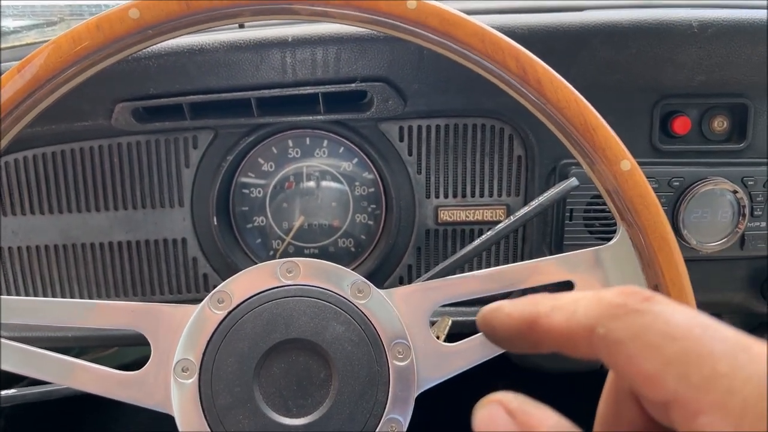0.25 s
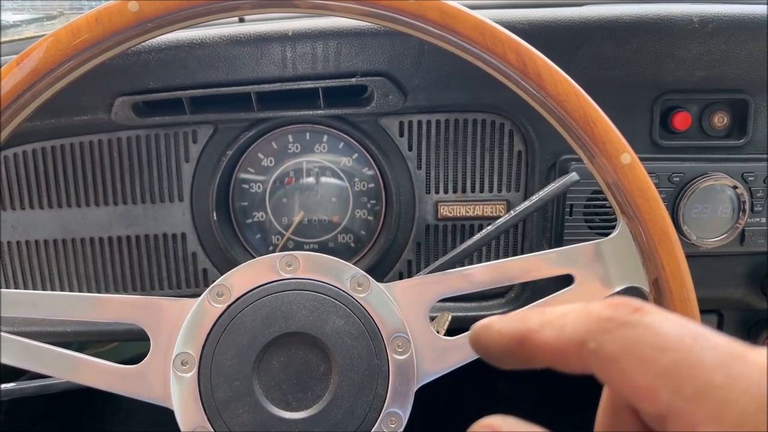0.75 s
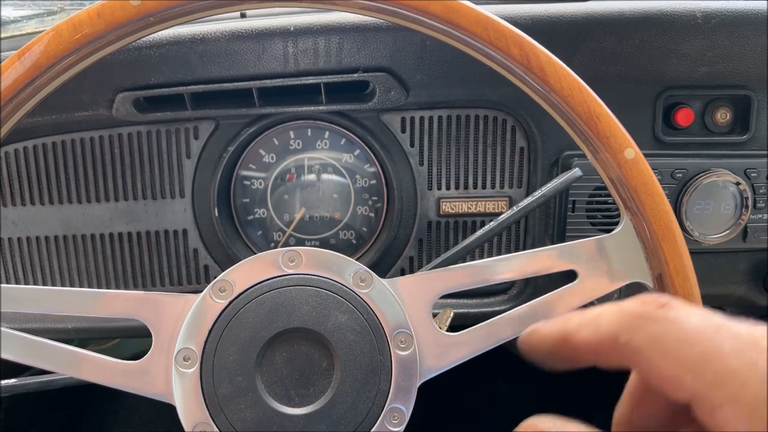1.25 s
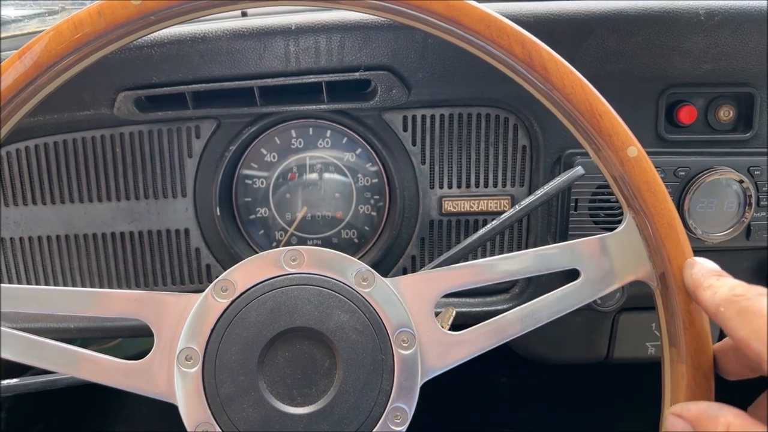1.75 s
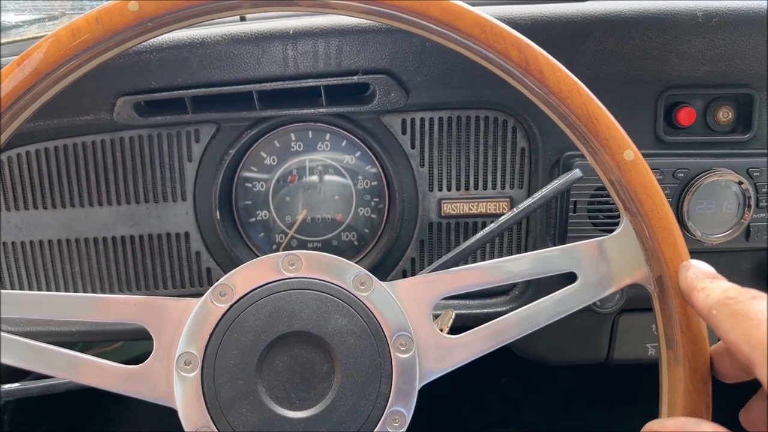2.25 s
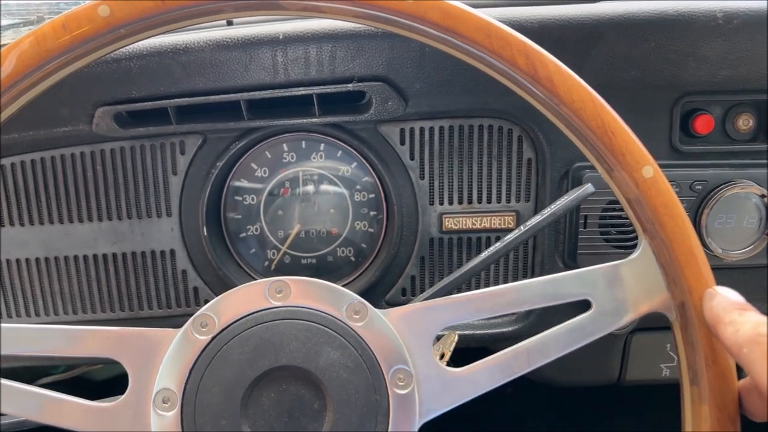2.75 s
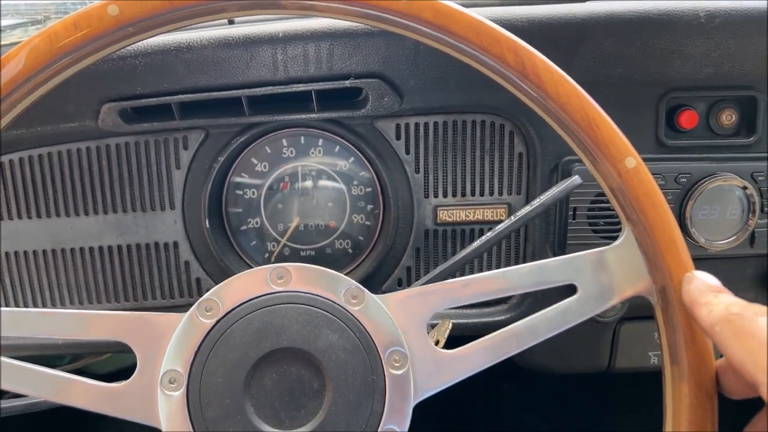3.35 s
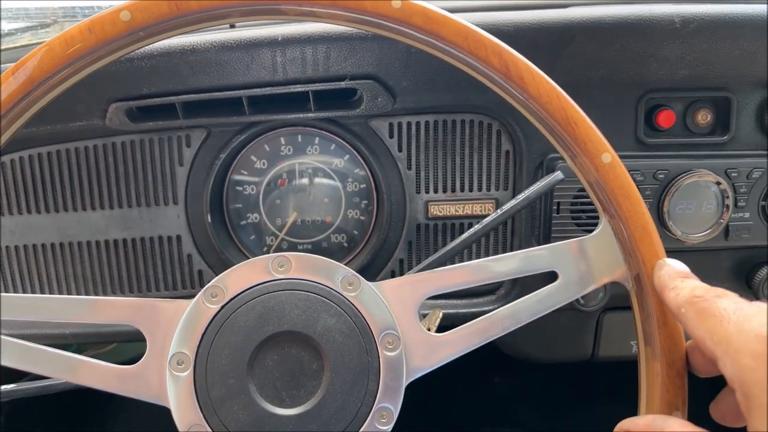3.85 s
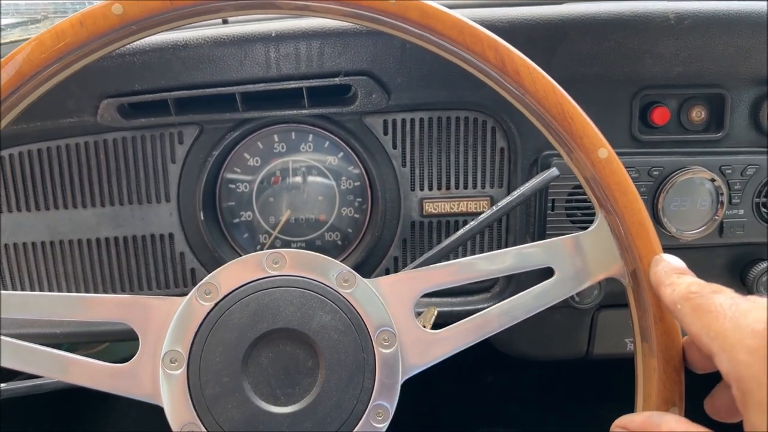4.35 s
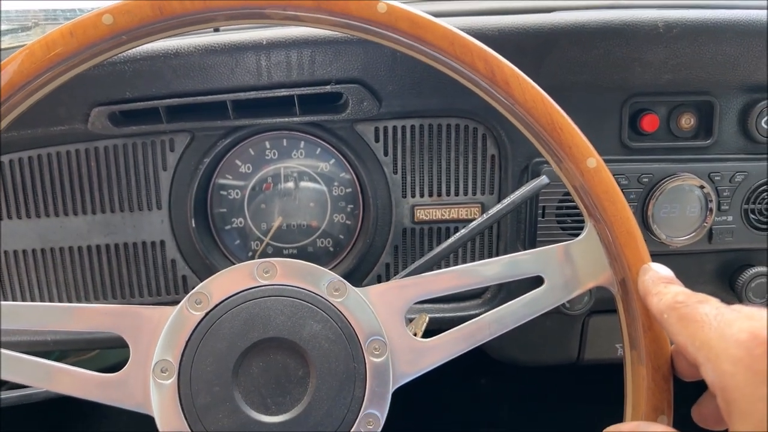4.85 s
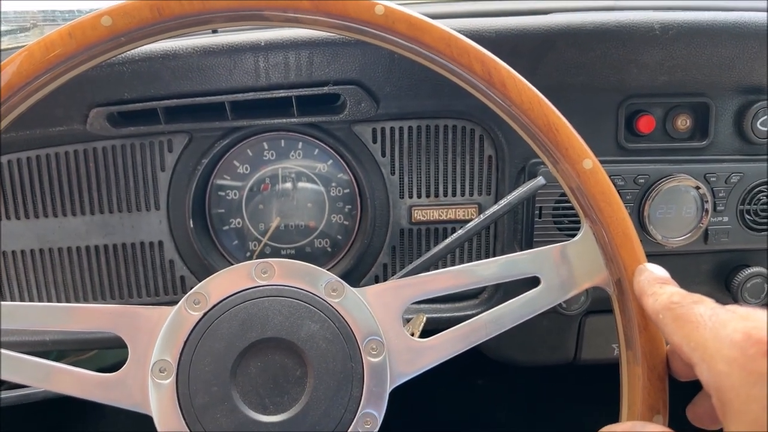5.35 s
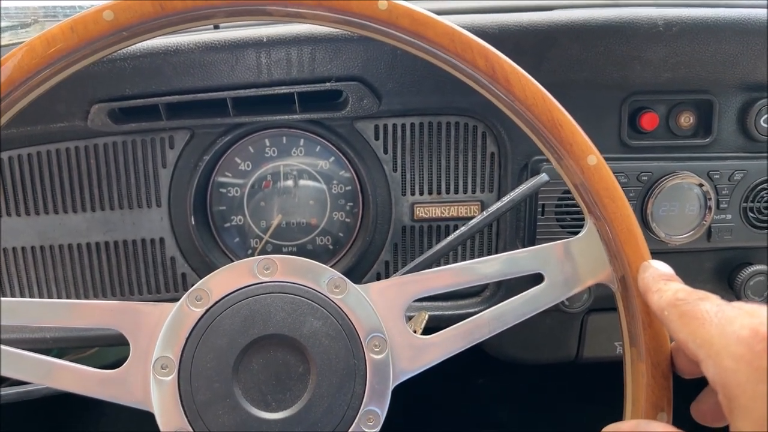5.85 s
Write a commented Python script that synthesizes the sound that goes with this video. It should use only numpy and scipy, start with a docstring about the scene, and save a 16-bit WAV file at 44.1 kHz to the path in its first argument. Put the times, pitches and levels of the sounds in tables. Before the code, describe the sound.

An air-cooled four-cylinder car engine is heard from the driver's seat, booming and rumbling through the cabin. A short rev sinks toward idle with a slight misfire. A longer rev follows, with ringing tappets, intake hiss and a roaring, faintly whining cooling fan. The engine then coasts down to an uneven chug with a few distinct valve taps, before a third rev starts climbing.

```python
"""Air-cooled four-cylinder engine from the driver's seat, at two microphone ports a few cm apart.
0-0.6 s: a short rev; the firing orders boom through the cabin, then sink toward idle and misfire.
1.5-3.9 s: a long rev; loose tappets ring, the intake hisses, the cooling fan roars and whines.
3.9-5.3 s: the engine coasts down to an uneven chug; single valve taps stand out.
From 5.3 s: a third rev climbs to the end, tappets ringing again. The mounts rumble throughout."""
import sys
import numpy as np
from scipy import signal
from scipy.fft import rfft, irfft, next_fast_len
from scipy.io import wavfile
from scipy.ndimage import uniform_filter1d

SR = 44100
rng = np.random.default_rng(int(sys.argv[2]) if len(sys.argv) > 2 else 0)


def master_out(mix):
    """Clip the mix to full scale and print it as 16-bit PCM to the path in sys.argv[1]."""
    frames = np.transpose(np.atleast_2d(mix))
    ceiling = np.clip(frames, -1, 1)
    pcm = np.round(ceiling * 32767).astype(np.int16)
    wavfile.write(sys.argv[1], SR, pcm)


N = 268524
TIME_S = np.arange(N) / SR

# crank speed: time_s, firing_hz
CRANK_SPEED = [(0.0, 56.1), (0.19, 68.7), (0.3, 77.8), (0.47, 85.8), (0.57, 89.4), (0.8, 74.4), (0.9, 69.6),
               (1.29, 51.1), (1.51, 42.3), (1.59, 41.8), (1.81, 54.1), (2.0, 64.4), (2.2, 72.6),
               (2.42, 77.6), (2.61, 80.5), (2.97, 85.0), (3.24, 87.1), (3.85, 90.6), (3.97, 82.7),
               (4.31, 65.7), (4.87, 42.2), (5.11, 32.6), (5.29, 31.8), (5.32, 32.6), (5.61, 49.3),
               (5.73, 56.4), (5.9, 65.8), (6.09, 72.7)]
# pedal presses, bark added to orders 8 and up: pressed_s, released_s, bark_db
PEDAL_PRESSES = [(-0.067, 0.565, -1), (1.48, 3.878, -1), (5.335, 6.5, 1)]
# orders 1, 2, 3 .. of the four-stroke cycle, order 4 the firing rate: throttle_open_db, throttle_shut_db
EXHAUST_ORDERS = [(-8.5, -0.5), (7, 7), (-14, -12), (2.5, 2), (-13, -25.5), (-3.5, -10.5), (-16, -8.5),
                  (0.5, -9.5), (-20, -24.5), (-14.5, -8), (-16.5, -35), (-1, -13), (-20, -32.5),
                  (-17.5, -15.5), (-15.5, -24), (-8, -25), (-25.5, -25.5), (-17.5, -16.5), (-16.5, -19),
                  (-20, -24.5), (-18, -26.5), (-33.5, -24), (-11.5, -22.5), (-26, -26), (-19, -21.5)]
# exhaust pipe resonance: firing_hz, order8_open_db, order8_shut_db, order4_shut_db
PIPE_RESONANCE = [(32, 13.5, 10.5, 2), (40, 2.5, 18, -0.5), (46.3, 4, -14.5, -4), (54.4, 3, 9, -3),
                  (56.3, 5.5, -0.5, 1), (61.2, 2, -0.5, 1), (70.6, -5, 7.5, 1.5), (73.4, -1.5, 6, 4),
                  (80, -11.5, 0.5, 2.5), (90.5, -15, -9.5, 2.5)]
# weak firings near idle: time_s, dip_db
WEAK_FIRINGS = [(1.27, -10), (1.34, -6), (1.51, -7), (4.6, -5), (4.885, -9), (5.12, -6), (5.19, -4),
                (5.28, -5), (5.39, -12)]
# modes of body shell and cabin air: pitch_hz, width_hz, left_db, right_db
CABIN_MODES = [(49.7, 3.4, -9, 9.5), (81.2, 8.3, 15, 3), (88, 14.8, 17.5, 18), (137.3, 6, 9, 12.5),
               (182.9, 15.9, 14.5, 7.5), (211.5, 8.7, 10, 9), (234.7, 4.7, -5.5, -7), (379.5, 12, -15.5, 3),
               (437, 31.3, 4.5, -2), (502, 22.2, -4.5, 6.5)]
# neighbouring modes cancelling at the seat: centre_hz, width_hz, depth_ratio
CABIN_NOTCHES = [(171.2, 6.8, 0.47), (281, 77, 0.55)]
# fan air and tinware: freq_hz, density_db
FAN_SPECTRUM = [(350, -30), (600, 0.5), (669, 2), (737, -9), (988, -4), (1980, -12.5), (2160, -15),
                (2300, -13.5), (2800, -15.5), (5240, -22.5), (8000, -30), (10400, -57.5), (17600, -120)]
# valve gear: freq_hz, density_db
CLATTER_SPECTRUM = [(2200, -8.5), (3000, 0.5), (3400, 2.5), (4000, -8), (4800, 0.5), (5500, -1),
                    (6500, -7.5)]
# rocker cover modes: pitch_hz, level_db, t60_s
COVER_MODES = [(3013, 1.5, 0.076), (3363, 6, 0.024), (4700, -4.5, 0.065), (5040, 5, 0.023),
               (5470, -10, 0.033)]
# valve taps that stand out at low speed: peak_s, level_db
VALVE_TAPS = [(4.6707, -67), (4.8408, -54), (4.9107, -50), (5.1237, -49), (5.1885, -51), (5.2743, -62),
              (5.366, -62), (5.5173, -62), (5.7024, -56), (5.849, -65)]
# loose tappets as the engine picks up: start_s, level_db, pitch_hz
TAPPET_HITS = [(1.5888, -52, 4580), (1.6851, -48, 4870), (1.7414, -46, 2950), (1.7604, -47, 4930),
               (1.8317, -52, 4850), (1.8344, -49, 2920), (1.9041, -51, 4620), (1.9505, -44, 2430),
               (2.0253, -50, 4900), (5.2744, -49, 4790), (5.3627, -48, 4640), (5.3916, -50, 4800),
               (5.4444, -47, 2980), (5.47, -44.5, 4860), (5.4929, -46, 3880), (5.5573, -52, 4830),
               (5.6244, -48, 4700), (5.6544, -46, 4750), (5.688, -45, 3070), (5.7024, -41, 4700),
               (5.7409, -43, 2550), (5.7808, -40, 4850), (5.8865, -44, 3020)]
# intake air: freq_hz, density_db
INTAKE_SPECTRUM = [(5500, -17), (7000, -7.5), (9000, 0.5), (11000, -7), (13000, -3.5), (15000, -8)]
# shaking that follows no order: freq_hz, density_db
RUMBLE_SPECTRUM = [(15, 4), (30, 2.5), (60, -11), (100, 2.5), (200, -4), (280, 6.5), (400, 0), (800, -7)]
# likeness of the ports: freq_hz, coherence_ratio
PORT_COHERENCE = [(600, 0.51), (1200, 0.61), (2500, 0), (5000, 0.3), (8000, 0.7)]
# phase between the ports: freq_hz, left_lead_rad
PORT_PHASE = [(430, 6.25), (780, 1.9), (1550, 2.78), (3100, 7.9), (4900, 7.6)]
# balance of the ports: freq_hz, left_minus_right_db
PORT_BALANCE = [(60, 7.5), (180, 3.5), (550, 1), (1650, 3.5), (4970, 8), (15000, -4.5)]

FULL_FIRING_HZ, FULL_PULL_HZ_PER_S = 90, 60  # reference speed and acceleration
PEDAL_RISE_S, PEDAL_RELEASE_S = 0.064, 0.02


def crank():
    """Pedal and crankshaft: firing rate, throttle 0-1, pull (acceleration over its reference)."""
    throttle = np.zeros(N)
    for pressed_s, released_s, _ in PEDAL_PRESSES:
        opening = 1 - np.exp(-np.maximum(TIME_S - pressed_s, 0) / PEDAL_RISE_S)
        throttle += opening * np.clip((released_s - TIME_S) / PEDAL_RELEASE_S + 0.5, 0, 1)
    firing_hz = uniform_filter1d(np.interp(TIME_S, *np.transpose(CRANK_SPEED)), size=2000, mode="nearest")
    pull = np.maximum(np.gradient(firing_hz) * SR / FULL_PULL_HZ_PER_S, 0)
    return firing_hz, throttle, uniform_filter1d(pull, size=8000)


def exhaust(cycles, throttle, firing_hz, pull, spread_turns=0.088, skew_turns=-0.33):
    """Orders of the four-stroke cycle; no two firings are alike, least so with the throttle shut."""
    shut, idle, bark = 1 - throttle, near_idle(throttle, firing_hz), bark_db()
    pipe_hz, *pipe_db = np.transpose(PIPE_RESONANCE)
    open8_db, shut8_db, shut4_db = (np.interp(firing_hz, pipe_hz, column) for column in pipe_db)
    boost_db = {4: shut * shut4_db,
                8: throttle * open8_db + shut * shut8_db,
                12: 12 * shut * np.clip((40 - firing_hz) / 8, 0, 1)}  # boom at the slowest coasting
    pulses = np.zeros(N)
    for order, (open_db, shut_db) in enumerate(EXHAUST_ORDERS, 1):
        unevenness = order * (0.0005 * order * throttle + 0.008 * shut + 0.012 * idle)
        waver = 1 + unevenness * (wander(hz=12) + 1j * wander(hz=12))
        phase_turns = order * cycles + spread_turns * order ** 2 + skew_turns  # offsets shape the pulse
        order_db = throttle * open_db + shut * shut_db + boost_db.get(order, 0) + (order >= 8) * bark
        pulses += gain_of(order_db) * (waver * np.exp(2j * np.pi * phase_turns)).real
    return gain_of(-26 + 4.5 * np.log10(firing_hz / FULL_FIRING_HZ) - pull) * pulses


def bark_db():
    """Each pedal press drives the upper orders a little harder or softer."""
    return sum(db * np.clip((TIME_S - pressed_s) / PEDAL_RISE_S, 0, 1) * (TIME_S < released_s)
               for pressed_s, released_s, db in PEDAL_PRESSES)


def near_idle(throttle, firing_hz, edge_hz=52):
    """Near 1 when coasting slowly, else near 0."""
    return (1 - throttle) / (1 + (firing_hz / edge_hz) ** 16)


def chug(cycles, throttle, firing_hz, thump_s=0.0017, uneven_db=2.5):
    """Near idle the mixture burns unevenly: each firing is a thump of its own strength."""
    firing = np.floor(4 * cycles).astype(int)
    strength = gain_of(-34 + uneven_db * rng.standard_normal(600))[firing]
    age = (4 * cycles - firing) / firing_hz / thump_s
    thump = age ** 2 * (3 - age) * np.exp(1 - age)
    return near_idle(throttle, firing_hz) * strength * thump


def misfire_gain(width_s=0.013):
    """The exhaust dips at each weak firing."""
    return gain_of(sum(db * np.exp(-((TIME_S - at_s) / width_s) ** 2) for at_s, db in WEAK_FIRINGS))


def cabin(shaking, low_hz=48, high_hz=830):
    """Shell and air resonate; each port hears the modes at its own strength."""
    size = next_fast_len(N + SR)
    hz = np.fft.rfftfreq(size, 1 / SR) + 1e-3
    power = sum(gain_of([[left_db], [right_db]]) ** 2 / (1 + ((hz - mode_hz ** 2 / hz) / width_hz) ** 2)
                for mode_hz, width_hz, left_db, right_db in CABIN_MODES)
    power /= (1 + (low_hz / hz) ** 6) * (1 + (hz / high_hz) ** 8)
    for notch_hz, width_hz, depth in CABIN_NOTCHES:
        power *= (1 - depth / (1 + (2 * (hz - notch_hz) / width_hz) ** 2)) ** 2
    log_gain = np.log(power + 1e-9) / 2
    minimum_phase_rad = -signal.hilbert(np.c_[log_gain, log_gain[:, -2:0:-1]]).imag[:, :len(hz)]
    return irfft(rfft(shaking, size) * np.exp(log_gain + 1j * minimum_phase_rad), size)[:, :N]


def fan(cycles, throttle, firing_hz, roar_db, blade_order=96.9, shroud_hz=2175, width_hz=30):
    """Cooling air roars; the blade whine builds with held speed and peaks where the shroud rings."""
    roar = port_noise(FAN_SPECTRUM, patchy_db=0.54)
    blade_hz = blade_order * firing_hz / 4
    shroud = 0.26 + 1 / np.sqrt(1 + (2 * (blade_hz - shroud_hz) / width_hz) ** 2)
    held = lagged(firing_hz > 70, lag_s=0.6)
    drift_turns = np.cumsum(10 * wander(hz=61.3)) / SR
    whine = np.cos(2 * np.pi * (blade_order * cycles + drift_turns))
    whine *= gain_of(-10.5 + 1.9 * wander(hz=8.3)) * shroud * held * (0.23 + 0.93 * throttle)
    return gain_of(roar_db + 1.1 * wander(hz=41.73)) * (roar + whine * gain_of([[2.5], [-2.5]]))


def valves(cycles, taps, hiss_db):
    """Rockers clatter once a firing, unevenly by cylinder; the level follows the intake's."""
    cylinder_db = np.array([-3.5, -8.0, -7.0, -6.5])[(4 * cycles).astype(int) % 4]
    blows = 1 + 0.67 * gain_of(cylinder_db + 1.4 * wander(hz=30.7)) * np.exp(-(4 * cycles % 1) / 0.47)
    clatter = port_noise(CLATTER_SPECTRUM, patchy_db=2.5)
    rings = rocker_covers(cycles)
    running = (clatter * blows + rings) * gain_of(-58 + 1.1 * (hiss_db + 63))
    return running + taps * (0.31 * clatter + 0.45 * rings)


def rocker_covers(cycles, rise_s=0.0022):
    """Eight valves close per cycle and ring the covers; each blow favours other modes."""
    closings = np.diff(np.floor(8 * cycles), prepend=0)
    age_s, rings = np.arange(4000) / SR, np.zeros(N)
    for pitch_hz, db, t60_s in COVER_MODES:
        envelope = gain_of(db - 60 * age_s / t60_s) * np.minimum(age_s / rise_s, 1)
        blows = closings * gain_of(3.1 * wander(hz=145))
        rings += signal.oaconvolve(blows, envelope * np.sin(2 * np.pi * pitch_hz * age_s))[:N]
    return evened(rings) * gain_of([[-3], [-9]])


def tap_envelope(rise_s=0.005, decay_s=0.018):
    """Single loud valve taps: fast rise, exponential decay."""
    envelope = np.zeros(N)
    for peak_s, db in VALVE_TAPS:
        age_s = TIME_S - peak_s
        envelope += gain_of(db) * np.clip(age_s / rise_s + 1, 0, 1) * np.exp(-np.maximum(age_s, 0) / decay_s)
    return envelope


def tappets(rise_s=0.003, t60_s=0.055):
    """Each loose tappet gives a short wavering ring at its own pitch."""
    age_s, rings = np.arange(4000) / SR, np.zeros(N + 4000)
    for start_s, db, pitch_hz in TAPPET_HITS:
        waver = 1 + 0.55 * evened(uniform_filter1d(rng.standard_normal(len(age_s)), size=60))
        envelope = gain_of(db - 60 * age_s / t60_s) * np.minimum(age_s / rise_s, 1) * waver
        rings[round(start_s * SR):][:len(age_s)] += envelope * np.sin(2 * np.pi * pitch_hz * age_s)
    return rings[:N] * gain_of([[2.5], [-2.5]])


def intake(cycles, throttle, taps, hiss_db):
    """Air sucked past the throttle plate, one gulp a cylinder, some stronger."""
    gulp_db = 0.8 * np.cos(2 * np.pi * cycles) + 0.57 * np.cos(8 * np.pi * cycles) + 0.49 * wander(hz=25.3)
    air = port_noise(INTAKE_SPECTRUM, patchy_db=2.5, coherence=0.94, left_delay_s=0.00015)
    return air * (gain_of(hiss_db + throttle) * evened(gain_of(gulp_db)) + 0.1 * taps)


def rumble(firing_hz, split_hz=290):
    """Loose shaking of engine and mounts; the upper band follows the speed more closely."""
    white, hz = rng.standard_normal((3, N)), np.fft.rfftfreq(N, 1 / SR)
    spectrum = rfft(white[0] + 0.43 * white[1:]) * gain_of(curve_at(RUMBLE_SPECTRUM, hz) - 22)
    low = irfft(spectrum / (1 + (hz / split_hz) ** 6), N)
    high = irfft(spectrum, N) - low
    speed = firing_hz / FULL_FIRING_HZ
    low *= gain_of(1.2 * wander(hz=11)) * (0.95 + 0.15 * speed ** 2)
    high *= gain_of(0.8 * wander(hz=14)) * (0.75 + 1.64 * speed ** 4)
    return low + high


def port_noise(spectrum, patchy_db, coherence=None, left_delay_s=None):
    """Coloured noise in drifting patches at both ports, by default per the port tables; mid rms 1."""
    hz = np.fft.rfftfreq(1024, 1 / SR)[:, None]
    left_re, left_im, other_re, other_im, patches = rng.standard_normal((N // 256 + 5, len(hz), 5)).T
    patches = evened(uniform_filter1d(uniform_filter1d(patches, size=10, axis=0), size=10, axis=1))
    if coherence is None:
        coherence = curve_at(PORT_COHERENCE, hz)
    left = left_re + 1j * left_im
    right = coherence * left + np.sqrt(1 - coherence ** 2) * (other_re + 1j * other_im)
    lead_rad = curve_at(PORT_PHASE, hz) if left_delay_s is None else -2 * np.pi * hz * left_delay_s
    tilt = gain_of(curve_at(PORT_BALANCE, hz) / 2) * np.exp(0.5j * lead_rad)
    outside_octaves = np.abs(np.log2((hz + 1) / np.clip(hz + 1, spectrum[0][0], spectrum[-1][0])))
    colour = gain_of(curve_at(spectrum, hz) - 40 * outside_octaves + patchy_db * patches)
    frames = np.array([left * tilt, right / tilt]) * colour
    pair = signal.istft(frames, nperseg=1024, noverlap=768)[1][:, :N]
    return pair / np.sqrt(np.mean(pair.mean(0) ** 2))


def airflow_db(firing_hz, pull, full_db, db_per_decade, pull_db, idle_db):
    """Three powers add: one rising with speed, one under pull, one constant."""
    turning = gain_of(full_db + db_per_decade * np.log10(firing_hz / FULL_FIRING_HZ))
    return 10 * np.log10(turning ** 2 + pull * gain_of(pull_db) ** 2 + gain_of(idle_db) ** 2)


def wander(hz):
    """Random drift through hz unit-variance knots a second."""
    knots = rng.standard_normal(int(N / SR * 200) + 3)
    return np.interp(TIME_S * hz, np.arange(len(knots)), knots)


def lagged(x, lag_s):
    """One-pole lag."""
    pole = np.exp(-1 / (lag_s * SR))
    return signal.lfilter([1 - pole], [1, -pole], x)


def curve_at(points, hz):
    """Interpolates a table over log frequency."""
    knots_hz, values = np.transpose(points)
    return np.interp(np.log(hz + 1), np.log(knots_hz + 1), values)


def gain_of(db):
    """Decibels to gain."""
    return 10 ** (np.asarray(db) / 20)


def evened(x):
    """Scales to rms 1."""
    return x / np.sqrt(np.mean(x ** 2) + 1e-20)


def scene(creep_db_per_s=0.55):
    """One crankshaft, four firings a cycle; fan roar and rumble trail its speed."""
    firing_hz, throttle, pull = crank()
    cycles, taps = np.cumsum(firing_hz) / SR / 4, tap_envelope()
    trailing_hz = firing_hz[0] + lagged(firing_hz - firing_hz[0], lag_s=0.042)
    roar_db = airflow_db(trailing_hz, pull, full_db=-40.5, db_per_decade=57, pull_db=-54, idle_db=-54.5)
    hiss_db = airflow_db(firing_hz, pull * throttle,
                         full_db=-62, db_per_decade=36, pull_db=-61, idle_db=-69.5)
    creep = gain_of(creep_db_per_s * (TIME_S - N / SR / 2))
    firings = exhaust(cycles, throttle, firing_hz, pull) + chug(cycles, throttle, firing_hz)
    boom = cabin(firings * misfire_gain() + creep * rumble(trailing_hz))
    rings = tappets()
    roar = fan(cycles, throttle, firing_hz, roar_db)
    clatter = valves(cycles, taps, hiss_db)
    hiss = intake(cycles, throttle, taps, hiss_db)
    return boom + rings + creep * (roar + clatter + hiss)


def record(dry, edge_hz=15620):
    """Recorder band limit."""
    lowpass = signal.firwin(1023, edge_hz, window=("kaiser", 9), fs=SR)
    return signal.oaconvolve(dry, lowpass[None], "same")


dry = scene()
out = record(dry)
master_out(out)
```